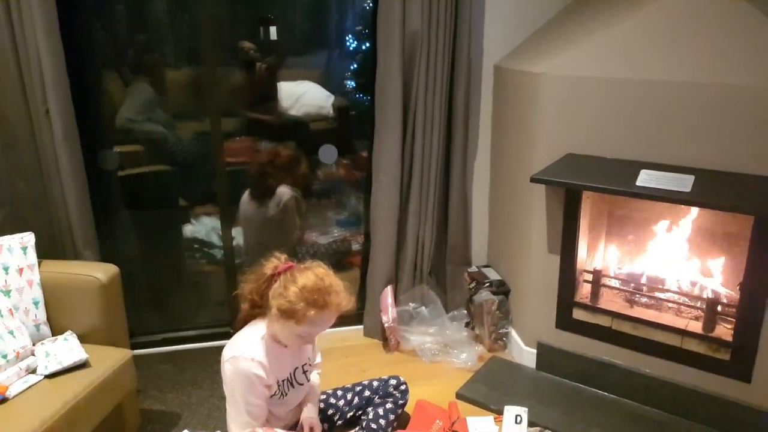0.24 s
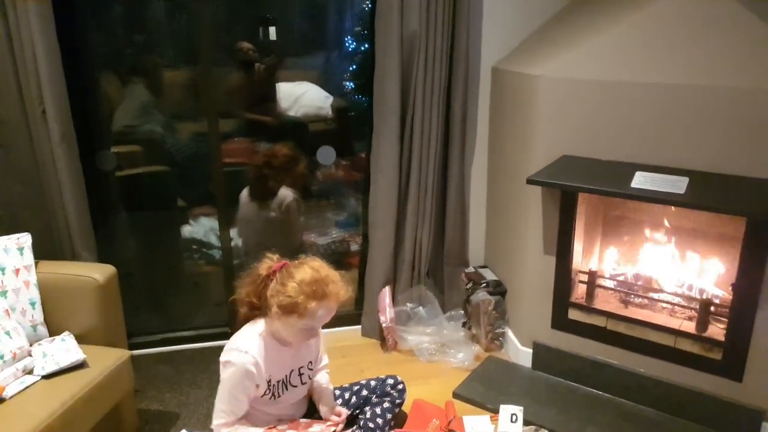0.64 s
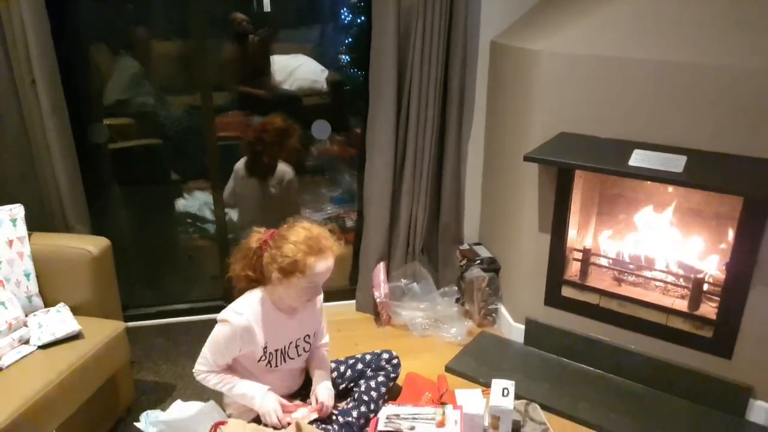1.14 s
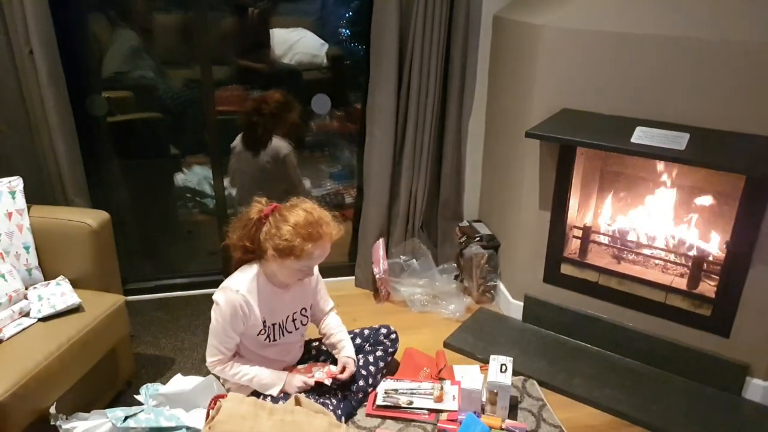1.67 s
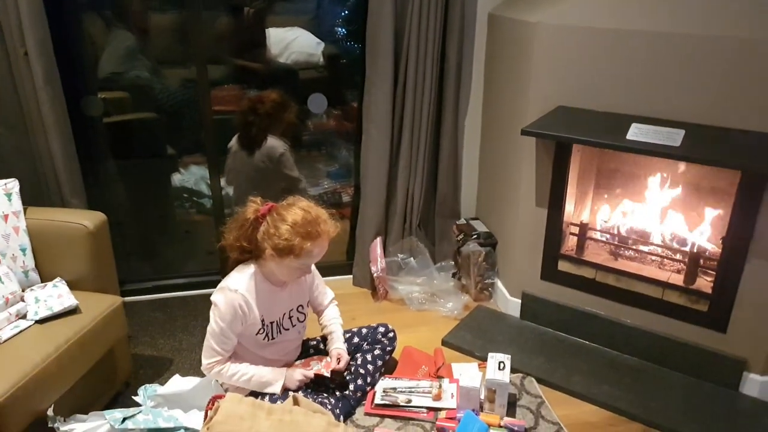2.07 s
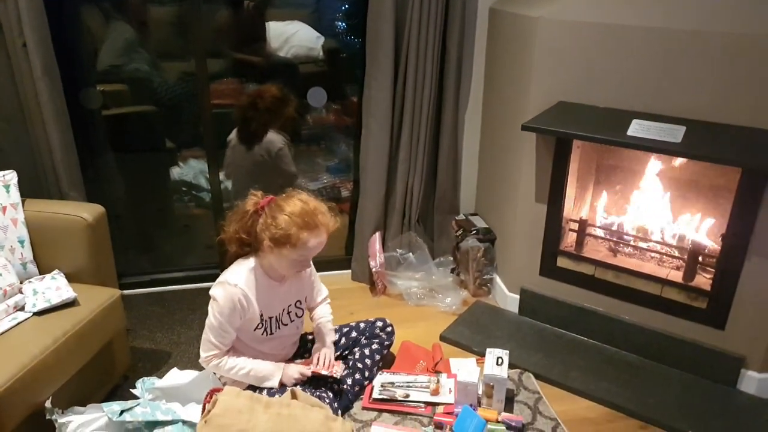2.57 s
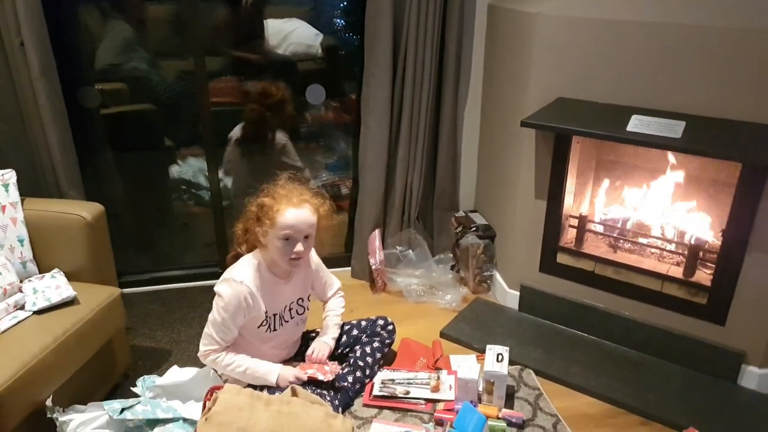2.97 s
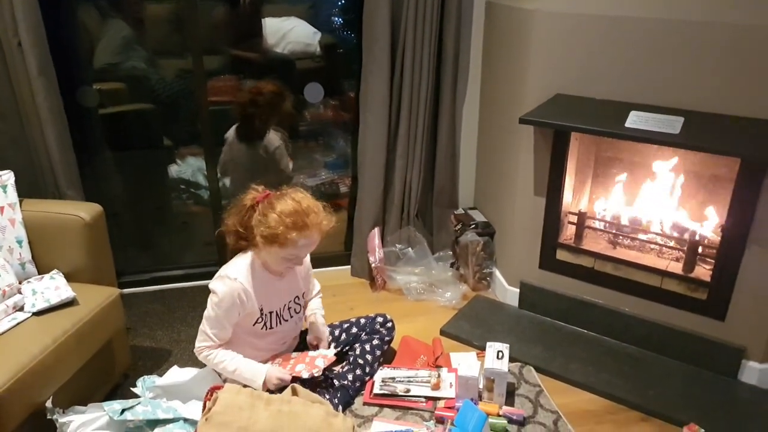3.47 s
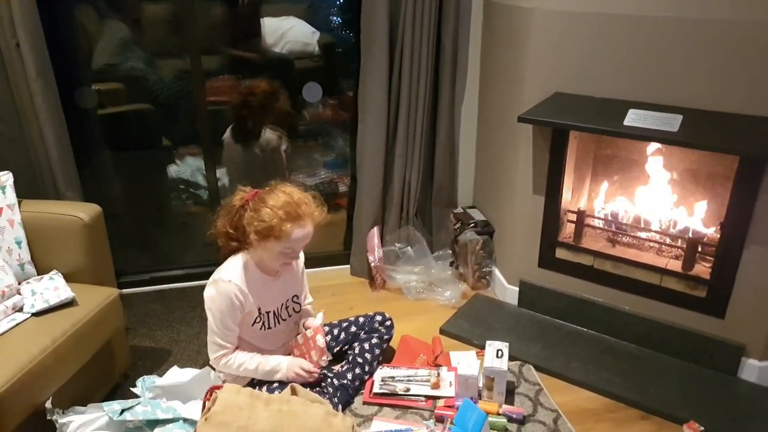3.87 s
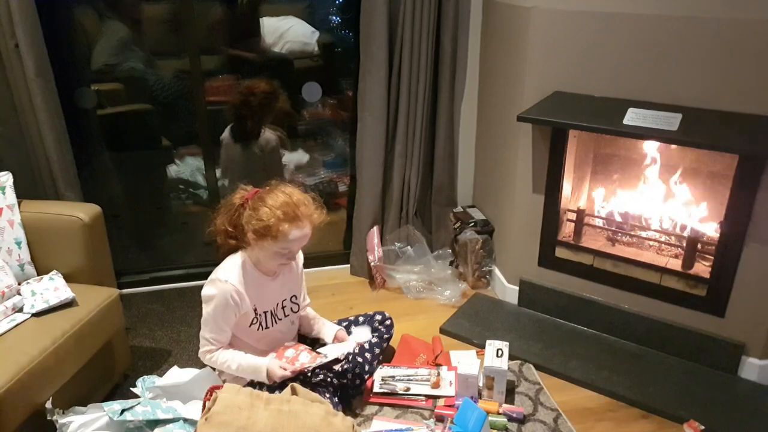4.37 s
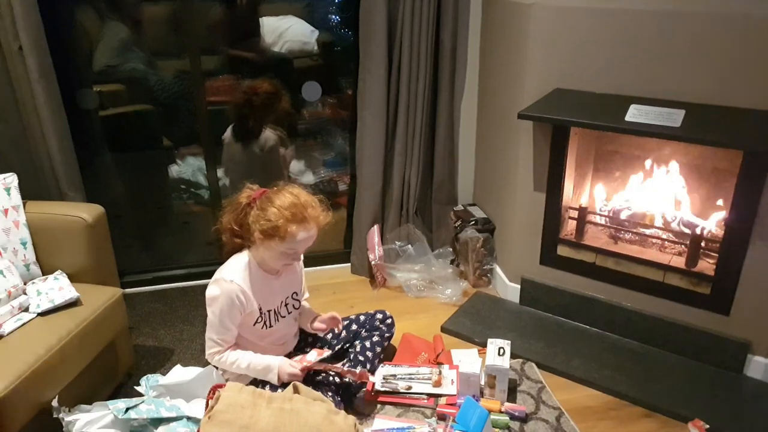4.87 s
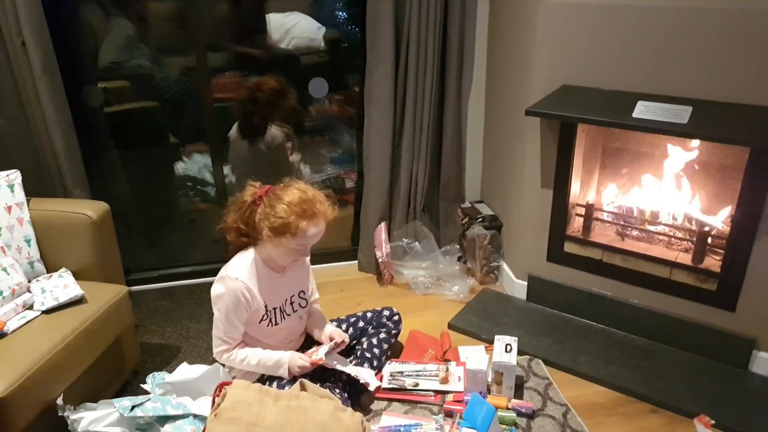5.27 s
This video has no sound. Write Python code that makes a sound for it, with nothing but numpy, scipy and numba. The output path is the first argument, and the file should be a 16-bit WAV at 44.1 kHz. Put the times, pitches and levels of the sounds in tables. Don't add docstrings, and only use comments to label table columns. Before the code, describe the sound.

Thin gift paper rustles, creases and tears in short scratchy bursts on a living-room floor, over a very faint low fire rumble.

```python
import sys
import numpy as np
from scipy import signal
from scipy.fft import rfft, irfft, next_fast_len
from scipy.io import wavfile
from scipy.ndimage import uniform_filter1d, map_coordinates
from numba import njit

SR = 44100
rng = np.random.default_rng(int(sys.argv[2]) if len(sys.argv) > 2 else 0)


def level_to_linear(level):
    exponent = np.asarray(level, float) / 20
    return 10 ** exponent


def digitize_waveform(pressure):
    field = np.atleast_2d(pressure).T
    bounded = np.clip(field, -1, 1)
    quanta = np.round(bounded * 32767).astype(np.int16)
    wavfile.write(sys.argv[1], SR, quanta)


N = 243873

SPOTS = 6
BARE_SPOTS = 2


def paper():
    # (lowest pitch [Hz], highest pitch [Hz], rate [pops/s], ringing [cycles],
    # size scatter [dB], tick level [dB], flicker [dB], loudness [dB])
    pops = [
        (154, 670, 610, 5.6, 2, -20, 3.5, -1),
        (629, 1906, 1600, 11.6, 2.0, -5, 2.5, -0.64),
        (1800, 6500, 4000, 4.1, 2.5, 3.5, 3, -1),
        (5980, 18840, 7200, 2.77, 2, 6.5, 4.5, -0.5),
    ]
    # (time [s], fibre peak [dB], scratch above
    # it [dB])
    ticks = [(0.0351, -41.0, -2.0), (0.0398, -41.0, -9.0), (0.1772, -36.0, 4.0), (0.1815, -34.0, 1.0),
             (0.3625, -38.0, -7.0), (0.4068, -47.0, 6.0), (0.4109, -38.0, -21.0),
             (0.4651, -28.0, -13.0), (0.4695, -35.0, 4.0), (0.4735, -32.0, -8.0),
             (0.4798, -41.0, 10.0), (0.5626, -41.0, -4.0), (0.5721, -36.0, -8.0),
             (0.6787, -43.0, 4.0), (0.6837, -42.0, -7.0), (0.7033, -40.0, -11.0),
             (0.7238, -38.0, -13.0), (0.7388, -24.0, -6.0), (0.7438, -34.0, -11.0),
             (0.7473, -32.0, -14.0), (0.7544, -28.0, 1.0), (0.8368, -41.0, 3.0),
             (0.8446, -35.0, -18.0), (0.8971, -43.0, -16.0), (0.9238, -58.0, -2.0),
             (0.9567, -66.0, 23.0), (0.9688, -35.0, -8.0), (0.9739, -38.0, -11.0),
             (0.9778, -34.0, -21.0), (1.0056, -40.0, -9.0), (1.0144, -43.0, -14.0),
             (1.1269, -36.0, -4.0), (1.1322, -41.0, -12.0), (1.2907, -44.0, -7.0),
             (1.2995, -56.0, 23.0), (1.3669, -46.0, -14.0), (1.3977, -36.0, 1.0),
             (1.4027, -38.0, 1.0), (1.4752, -27.0, -2.0), (1.5511, -57.0, 26.0),
             (1.5759, -27.0, -2.0), (1.5805, -38.0, 8.0), (1.6157, -39.0, 5.0), (1.7118, -52.0, 12.0),
             (1.8061, -44.0, 6.0), (1.8662, -36.0, -1.0), (1.8734, -32.0, -6.0),
             (1.974, -38.0, -17.0), (2.0235, -42.0, -8.0), (2.1399, -19.0, -13.0),
             (2.1447, -21.0, -12.0), (2.2364, -38.0, -14.0), (2.241, -34.0, -10.0),
             (2.2723, -19.0, 0.0), (2.4151, -43.0, 13.0),
             (2.4914, -41.0, -6.0), (2.5393, -46.0, 0.0), (2.5584, -50.0, 14.0), (2.5871, -62.0, 28.0),
                  (2.6039, -41.0, -1.0), (2.6096, -36.0, 1.0), (2.6865, -38.0, -19.0),
                  (2.6911, -39.0, -5.0), (2.7403, -39.0, 8.0), (2.7787, -34.0, 4.0), (2.9124, -42.0, 16.0),
                  (2.9168, -36.0, -15.0), (3.0855, -23.0, -9.0), (3.094, -23.0, -15.0),
                  (3.1237, -28.0, -5.0), (3.1321, -31.0, -10.0), (3.1971, -47.0, -7.0),
                  (3.2326, -32.0, 1.0), (3.2416, -29.0, -21.0), (3.2671, -38.0, -10.0),
                  (3.2854, -34.0, 3.0), (3.2937, -34.0, -22.0), (3.3514, -45.0, 7.0),
                  (3.6763, -46.0, -10.0), (3.7346, -28.0, 0.0), (3.7403, -36.0, -16.0),
                  (3.7809, -30.0, 0.0), (3.8697, -35.0, 1.0), (4.033, -40.0, 11.0), (4.0972, -32.0, -1.0),
                  (4.1387, -36.0, -7.0), (4.1445, -38.0, -13.0), (4.2204, -36.0, 2.0),
                  (4.2255, -40.0, -1.0), (4.5298, -30.0, 1.0), (4.5516, -40.0, 9.0), (4.611, -22.0, -2.0),
                  (4.621, -29.0, -9.0), (4.8172, -48.0, 18.0), (4.8698, -64.0, 27.0), (4.9339, -37.0, -3.0),
                  (4.9386, -39.0, -10.0), (4.9949, -43.0, -3.0), (5.0, -48.0, -10.0), (5.0087, -51.0, 15.0),
                  (5.1169, -24.0, -1.0), (5.1531, -29.0, 1.0), (5.2496, -52.0, 17.0), (5.2744, -38.0, 1.0),
                  (5.279, -40.0, -1.0), (5.2831, -41.0, -12.0), (5.298, -31.0, -2.0),
                  (5.4185, -35.0, -10.0), (5.4334, -41.0, 6.0), (5.4847, -50.0, 13.0),
             (1.432, -52, 8), (1.481, -33, 9), (2.278, -20, -7), (2.284, -20, -9), (2.294, -26, -1),
                  (2.908, -38, 6), (2.9565, -42, -10), (2.9604, -31, 5), (3.013, -25, 2), (3.03, -28, 5),
                  (3.0426, -25, -3), (3.09, -18, -17), (4.2458, -31, -6), (4.2508, -31, -8),
                  (4.298, -29, 3), (4.352, -30, 5), (4.3775, -27, 3), (4.394, -31, 0), (4.408, -25, -6),
                  (4.4647, -22, 2), (4.478, -21, 0)]
    tick_s, tick_db, scratch_db = np.transpose(ticks)
    count = len(tick_s)
    crease_db = scratch_db - 9
    tick_over_db = [crease_db, crease_db, scratch_db, 0]
    tick_spot, tick_start = np.arange(count) % BARE_SPOTS, (tick_s * SR).astype(int)
    rebound = 0.32

    cracks = [(np.zeros(count), 0.63)]
    for j, wait in enumerate(rng.random((3, count))):
        cracks.append((wait * 0.0012, (-1) ** j * level_to_linear(-2) * (1 - wait)))

    drive_db = 10 * np.log10(effort())
    usual_db = np.median(drive_db, axis=1)
    swing_db = drive_db - usual_db[:, None]
    hand = np.tanh(walk(45))

    place, moment, luck = rng.random((int(90 * N / SR), 3)).T
    small_spot, small_start = (place * SPOTS).astype(int), (moment * (N - 1)).astype(int)
    small_db = 1 - 1.5 * np.log(luck + .04)

    out = 0
    for k, (lo_hz, hi_hz, rate, cycles, scatter_db, sharp_db, flicker_db, loud_db) in enumerate(pops):
        when, pitch, luck, place = rng.random((int(rate * N / SR), 4)).T
        start = (when * N).astype(np.int64)
        hz = lo_hz * (hi_hz / lo_hz) ** pitch
        lean = k + 1.3 * (pitch - .5)
        level_db = usual_db[k] + map_coordinates(swing_db, [lean, start], order=1, mode="nearest")
        size = level_to_linear(-scatter_db * np.log(luck + 0.001))
        size *= np.sqrt(SR / rate / np.mean(size ** 2))
        size *= level_to_linear(level_db + loud_db + flicker_db * hand[start])
        pole = np.exp((2j * np.pi - np.log(1000) / 2 / cycles) * hz / SR)
        swarm = ring(start, (place * SPOTS).astype(np.int64), pole, size, (SPOTS, N))

        band_share = SR / 2 / (hi_hz - lo_hz)
        crack = level_to_linear(tick_db + tick_over_db[k] + sharp_db) * band_share
        for late, share in cracks:
            at = tick_start + (late * SR).astype(int)
            swarm[tick_spot, at] += share * crack
            swarm[tick_spot, at + 1] -= rebound * share * crack
        crackle = level_to_linear(drive_db[k, small_start] + small_db + sharp_db)
        swarm[small_spot, small_start] += crackle * np.sqrt(band_share)

        band = signal.butter(2, [0.7 * lo_hz, 0.92 * hi_hz], "band", fs=SR, output="sos")
        out = out + signal.sosfilt(band, swarm)
    return out


def effort():
    # (middle [s], scratch level [dB], length [s],
    # bulk: folds above scratch [dB], fibres above scratch [dB])
    pulls = [(0.249, -43, 0.076, -13.5, -1), (0.393, -55.5, 0.047, -7, -1), (0.585, -53, 0.055, -8, -2.5),
             (0.791, -49, 0.05, -12, 3), (0.904, -55, 0.14, -1.5, -11), (1.315, -55.5, 0.37, -19, -12),
             (1.576, -53.5, 0.2, -11.5, -1.5), (1.692, -58, 0.02, -2, -15), (1.88, -52.5, 0.066, -28, -2),
             (2.168, -53.5, 0.1, -0.5, 8), (2.426, -55.5, 0.13, -10, -7), (2.624, -52, 0.14, -5, -2.5),
             (2.84, -47.5, 0.1, -6, 2.5), (3.032, -43.5, 0.075, -9, -2.5), (3.252, -50, 0.3, -8, -11),
             (3.409, -44, 0.052, -1, 2.5), (3.868, -47, 0.16, -5.5, -4), (4.138, -56.5, 0.08, -19, -0.5),
             (4.316, -38, 0.063, -18.5, -2), (4.403, -33.5, 0.053, -6, -3), (4.466, -33.5, 0.02, -6, 1),
             (4.258, -52, 0.018, 1, -1.5), (3.068, -45.5, 0.036, -9, 5.5), (2.35, -55, 0.022, 3.5, 0),
             (2.075, -62, 0.028, -3, 8), (4.002, -54, 0.022, -6, -18), (4.725, -54.5, 0.064, -4.5, -10),
             (5.042, -54, 0.064, -8, -16), (5.167, -49, 0.035, -30, -0.5), (5.343, -52.5, 0.33, -4, -24)]
    # (snap time [s], length [s], depth [dB])
    hushes = [(0.1745, 0.063, 13), (0.455, 0.051, 0), (0.681, 0.028, 4), (0.744, 0.023, 5),
              (1.126, 0.069, 7), (1.393, 0.03, -1), (1.476, 0.018, 4), (1.568, 0.034, 3), (1.8, 0.055, 2),
              (2.273, 0.019, -1.5), (2.94, 0.033, 14), (3.072, 0.018, 1), (3.235, 0.047, 8.5),
              (3.35, 0.033, 4), (3.7407, 0.019, 8), (4.095, 0.026, 4), (4.2186, 0.033, 10),
              (4.526, 0.061, 2.5), (4.605, 0.013, 6), (4.665, 0.026, 0), (4.832, 0.03, 1),
              (4.947, 0.035, 4.5), (5.12, 0.021, 10), (5.253, 0.028, 3), (5.403, 0.022, 3),
              (0.928, 0.056, 10), (1.08, .08, -4), (2.598, 0.026, 8), (3.157, 0.016, 3), (3.779, .02, 7),
              (4.894, .04, 5), (0.563, .03, -1), (3.03, 0.0092, 2), (3.669, 0.018, 3), (2.95, 0.022, -1)]
    # (time [s], scratch level [dB], swarm t60 [s], bulk: folds above scratch [dB])
    rips = [(0.0335, -52.5, 0.43, -13), (0.4632, -47, 0.14, -11.5), (0.563, -43.5, 0.17, -11),
            (0.737, -49.5, 0.17, -5), (.9688, -50.5, .12, -21), (1.126, -55, 0.29, -21),
            (1.575, -47, 0.016, -73), (1.8721, -48.5, 0.091, -16), (1.958, -57, 0.26, -12),
            (2.1394, -36, 0.2, -11.5), (2.5381, -62, 0.06, -8), (3.781, -43, 0.06, -20),
            (4.6104, -33.5, 0.05, -37), (4.933, -48.5, 0.091, -11), (5.117, -44, 0.11, -25),
            (5.2965, -50.5, 0.43, -21), (5.408, -53, 0.42, -1)]
    # (time [s], scratch level [dB], swarm t60 [s], bulk [dB])
    buckles = [(0.0547, -38, 0.1, -45), (0.066, -37.5, 0.095, -41), (0.241, -39, 0.025, -6),
               (0.404, -36, 0.016, -21), (0.572, -30.5, 0.04, -2), (0.6774, -44.5, 0.076, -4),
               (1.265, -55.5, 1, 0), (1.2973, -49.5, 0.26, -9), (1.425, -40.5, 0.27, -15.5),
               (2.272, -26.5, 0.17, -4), (2.607, -50, 0.39, -32), (2.698, -38, 0.049, -30),
               (3.083, -36.5, 0.35, -7.5), (3.104, -27.5, 0.06, -9), (3.231, -40, 0.2, -25),
               (3.356, -35, 0.4, -29), (3.673, -50, 0.13, -9), (4.095, -43, 0.053, 3.5),
               (5.153, -44.5, 0.034, 20)]
    # (time [s], scratch level [dB], swarm t60 [s], bulk [dB])
    scrapes = [(0, -61, 0.1, -29), (0.178, -38, 0.11, -36), (.313, -27.5, 0.027, -43),
               (0.7543, -34.5, 0.15, -23), (1.198, -53.5, 0.2, -32), (1.396, -40.5, 0.29, -15),
               (1.478, -36, 0.13, -12.5), (1.803, -53.5, 0.62, -3), (1.849, -49, 0.26, -6),
               (2, -46, 0.14, -30), (2.415, -57, 0.05, 12), (2.739, -37.5, 0.05, -9),
               (2.91, -23, 0.017, -18), (3.7339, -41, 0.17, 4), (3.7529, -34, 0.037, -3),
               (3.9087, -34.5, 0.36, -5.5), (4.0123, -41, 0.11, -9), (4.0322, -46, 0.075, -18),
               (4.1435, -51, 0.13, -6), (4.2184, -61, 0.16, -6), (4.245, -36, 1, -41),
               (4.378, -27.5, 0.14, -24), (4.81, -45.5, 0.19, 1.5), (4.868, -51.5, 0.13, -12),
               (5.2725, -37.5, 0.12, -26), (5.369, -37, 0.038, -24)]
    # (time [s], scratch level [dB], swarm t60 [s], bulk [dB])
    crumples = [
        (0.613, -40.5, 0.066, -6),
        (1.549, -38, 0.056, -14),
        (2.451, -36.5, 0.055, -9),
        (3.29, -54.5, 0.22, 7),
        (4.455, -30, 0.11, 1),
        (5.079, -42, 0.27, 4.5),
        (5.2485, -42, 0.065, -13),
        (5.482, -35, 0.029, -10),
    ]
    # (time [s], scratch level [dB], swarm t60 [s], bulk [dB])
    swells = [
        (.95, -46.5, 0.18, -7),
        (1.603, -35, 0.078, -36),
        (2.776, -32.5, 0.14, -5),
        (2.945, -43.5, 1, -17),
        (3.66, -53, 0.076, 0),
        (4.535, -35, 0.28, -7),
        (4.656, -37.5, 0.28, -26),
        (4.992, -47.5, 0.13, -37),
    ]
    # (creases above scratch [dB], share of the bulk that creases follow [0-1],
    # fibres above scratch [dB], rise [s])
    kinds = [
        (11.5, 1, 5.5, 0.00047),
        (-1.5, .02, -4, 0.0044),
        (-8.5, 0.18, -8, 0.0016),
        (-7, .05, -31, 0.0047),
        (-1.5, 0.15, 2.5, 0.018),
    ]
    # (start [s], end [s])
    still = (3.514, 3.655)
    rest_db, rise_db_s, fall_db_s, settle_db_s = -74.5, 190, 256, 244

    t = np.arange(N) / SR
    power = np.full((4, N), level_to_linear(rest_db) ** 2)
    for middle, db, length, bulk_db, fibre_db in pulls:
        near = slice(max(int((middle - .6) * SR), 0), int((middle + .6) * SR))
        early, late = middle - length / 2 - t[near], t[near] - middle - length / 2
        shape_db = db - np.maximum(np.maximum(early * rise_db_s, late * fall_db_s), 0)
        over_db = np.array([[bulk_db], [0.43 * bulk_db], [0], [fibre_db]])
        power[:, near] += (level_to_linear(shape_db) * level_to_linear(over_db)) ** 2

    for snaps, colour in zip((rips, buckles, scrapes, crumples, swells), kinds):
        crease_db, share, fibre_db, rise = colour
        for s, db, t60, bulk_db in snaps:
            start = int(s * SR)
            swarm = power[:, start:start + int(t60 * SR)]
            over_db = np.array([[bulk_db], [crease_db + share * bulk_db], [0], [fibre_db]])
            since = t[:swarm.shape[1]]
            fade = level_to_linear(db - 60 * since / t60) * np.minimum(since / rise, 1)
            swarm += (fade * level_to_linear(over_db)) ** 2

    hush_db = np.zeros(N)
    for s, length, depth_db in hushes:
        hush_db += max(depth_db, 0) * np.clip(1 - (s - t) / length, 0, 1) * (t < s)
    hush_share = np.array([[1], [1], [1], [1.7]])
    settle_db = settle_db_s * (t - still[0]) * (t > still[0]) * (t < still[1])
    return power * level_to_linear(-hush_db * hush_share - settle_db) ** 2


def walk(rate):
    k = int(SR / rate)
    steps = np.repeat(rng.standard_normal(N // k + 1), k)
    return 1.7 * uniform_filter1d(uniform_filter1d(steps, k), k)[:N]


@njit
def ring(start, spot, pole, size, shape):
    out = np.zeros(shape)
    for k in range(len(start)):
        z = size[k] * np.sqrt(2 * (1 - abs(pole[k]) ** 2)) + 0j
        end = min(shape[1], start[k] + int(-6 / np.log(abs(pole[k]))))
        for i in range(start[k], end):
            z *= pole[k]
            out[spot[k], i] += z.imag
    return out


def panels():
    # (time [s], peak level [dB], pitch [Hz])
    strikes = [(0.0657, -29, 1430), (0.1805, -30, 1980), (2.2724, -20, 1800), (2.2757, -19.5, 2210),
               (2.2874, -31, 1140), (2.6948, -31, 1063), (3.2321, -29, 1360), (5.4041, -28.5, 1070),
               (5.4735, -28.5, 934), (0.7532, -28, 4100), (0.7744, -45, 3800), (1.4344, -39, 2980),
               (2.2722, -32, 3900), (2.2765, -28, 4150), (2.283, -32, 2370), (4.0143, -31, 3480),
               (1.4316, -44, 2330), (4.30, -34, 1490), (4.345, -27, 1660), (4.415, -31, 1300),
               (3.0445, -21, 3060), (4.3994, -21, 3350), (5.4834, -34.5, 2570), (0.0653, -36, 2600),
               (0.1815, -39, 1540), (0.1994, -35, 2740), (0.2694, -33, 2120), (0.3194, -43, 2530),
               (0.5774, -37, 2970), (1.4316, -29, 1470), (1.4894, -45, 4030), (2.2864, -24, 1460),
               (2.2944, -24.5, 1880), (2.795, -42, 2910), (3.1103, -26.5, 2940), (3.3672, -32, 4200),
               (3.9095, -27.5, 2670), (3.9494, -27, 1770), (4.3774, -21, 3400), (4.4094, -27, 3350),
               (4.4394, -24, 2610), (4.4694, -28, 1700), (5.3672, -31, 4100), (0.6785, -44, 520),
               (2.287, -27, 497), (2.33, -35.5, 493), (2.29, -27, 1090), (4.475, -35, 780),
               (4.40, -21, 4300), (4.35, -29, 444), (4.455, -24.5, 406), (4.40, -30, 390),
               (4.43, -31.5, 446), (4.48, -34, 358), (0.574, -51, 430), (0.889, -36.5, 245),
               (2.141, -32.5, 500), (2.799, -41, 507), (3.103, -30.5, 518), (3.399, -33, 437),
               (5.089, -52, 477), (5.152, -31, 400), (5.436, -31.5, 630), (5.499, -28, 141)]
    s, peak_db, hz = np.transpose(strikes)
    cycles = 11 * np.sqrt(hz / 1000)
    pole = np.exp((2j * np.pi - np.log(1000) / 2 / cycles) * hz / SR)
    size = level_to_linear(peak_db - 1.5) / np.sqrt(2 * (1 - abs(pole) ** 2))
    return ring((s * SR).astype(np.int64), np.arange(len(s)) % SPOTS, pole, size, (SPOTS, N))


def room(spots):
    # (frequency [Hz], level [dB])
    tone = [(150, -9), (330, -4), (500, 3), (720, -4.5), (1500, -2), (2300, -0.4), (3500, 3.5), (5000, 4.5),
            (7400, -0.5), (9700, 3.5), (12000, 2.5), (15500, -1)]
    # (frequency [Hz], left minus right [dB])
    port_balance = [(150, -0.5), (500, 0.5), (1200, 1.5), (2500, 0.1), (5000, -1.5), (8000, 5.5),
                    (10000, -6.5), (13000, 6)]
    size, heard = next_fast_len(N + SR // 2), 0
    hz = np.arange(size // 2 + 1) * SR / size
    for k, x in enumerate(spots):
        lag = 3.9 + 1.2 * rng.standard_normal()
        direct = np.exp(-2j * np.pi * hz / SR * np.array([[0], [lag]]))
        echo_db = -6 if k < BARE_SPOTS else 0
        heard = heard + rfft(x, size) * (direct + level_to_linear(echo_db) * rfft(echoes(SR // 2), size))
    sides_db = on_log(port_balance, hz) * np.array([[.5], [-.5]])
    return irfft(heard * level_to_linear(on_log(tone, hz) - 3.5 + sides_db), size)[:, :N]


def echoes(length):
    # (frequency [Hz], t60 [s], echo over direct sound [dB], likeness of left and right [0-1])
    bands = [(300, .27, 2.0, .87), (1000, .23, 2.5, .12), (3300, .2, 1.5, .02), (10000, .125, 1.0, 0)]
    t, hz = np.arange(length) / SR, np.arange(length // 2 + 1) * SR / length
    noise, tail = pair(length, on_log(bands, hz, column=3)), 0
    early = level_to_linear(3 - 60 * t / .06)
    onset = np.clip((t - .003) / 0.0024, 0, 1)
    for k, (_, t60, echo_db, _) in enumerate(bands):
        share = on_log([(row[0], j == k) for j, row in enumerate(bands)], hz)
        fade = (level_to_linear(-60 * t / t60) + early) * onset
        tail = tail + level_to_linear(echo_db) * irfft(noise * share, length) * fade / np.sqrt(np.sum(fade ** 2))
    return tail


def on_log(table, hz, column=1):
    table = np.array(table, float)
    return np.interp(np.log(np.maximum(hz, 1)), np.log(table[:, 0]), table[:, column])


def pair(length, likeness):
    mid, side = rfft(rng.standard_normal((2, length)))
    alike = np.clip(likeness, 0, 1)
    opposite = side * np.array([[1], [-1]])
    return (np.sqrt(1 + alike) * mid + np.sqrt(1 - alike) * opposite) / np.sqrt(2)


def fire():
    # (time [s], rumble level [dB])
    flames = [(0.0, -75), (0.17, -59), (0.66, -66.5), (0.72, -59.5), (0.98, -63.5), (1.08, -76), (1.2, -59),
              (1.26, -70), (1.35, -60.5), (1.43, -69.5), (1.86, -63), (2.0, -74), (2.11, -65.5),
              (3.46, -63.5), (3.569, -68), (4.47, -59), (5.24, -68.5), (5.53, -56)]
    # (frequency [Hz], level [dB per Hz])
    rumble_tone = [(20, -17), (40, -4), (70, -1.5), (100, 3.5), (130, -4.5), (200, -11), (400, -22),
                   (800, -71)]
    # (frequency [Hz], likeness of left and right [0-1], left minus right [dB])
    rumble_sides = [(30.2, 0.5, 6), (61.4, 0.86, -7.5), (130, 1, -1)]
    # (frequency [Hz], level [dB per Hz])
    hiss_tone = [(150, -9), (250, -7.5), (330, -20.5), (1000, -17.5), (2200, -40), (4190, -19.5),
                 (7190, -27.5), (16000, -30)]
    size = next_fast_len(N)
    hz = np.arange(size // 2 + 1) * SR / size
    sides = level_to_linear(on_log(rumble_sides, hz, column=2) * np.array([[.5], [-.5]]))
    rumble = pair(size, on_log(rumble_sides, hz)) * level_to_linear(on_log(rumble_tone, hz)) * sides
    rumble = irfft(rumble, size)[:, :N]
    hiss = irfft(pair(size, 0.11) * level_to_linear(on_log(hiss_tone, hz)), size)[:, :N]
    swell = level_to_linear(np.interp(np.arange(N) / SR, *np.transpose(flames)))
    return rumble / np.std(rumble) * swell + hiss / np.std(hiss) * level_to_linear(-71)


def scene():
    return room(paper() + panels()) + fire()


def band_limit(x):
    return signal.sosfilt(signal.butter(12, 16820, fs=SR, output="sos"), x)


def record(dry):
    ceiling, gate_db, gate_depth, top_hz = .2, -74, 0.55, 15780
    loudness = np.sqrt(uniform_filter1d(np.mean(dry ** 2, axis=0), SR // 40) + 1e-12)
    gated = dry * np.minimum(loudness / level_to_linear(gate_db), 1) ** gate_depth
    rounded = ceiling * np.tanh(gated / ceiling)
    cut = signal.sosfilt(signal.ellip(8, .2, 50, top_hz, fs=SR, output="sos"), rounded)
    return band_limit(cut)


dry = scene()
out = record(dry)
digitize_waveform(out)
```